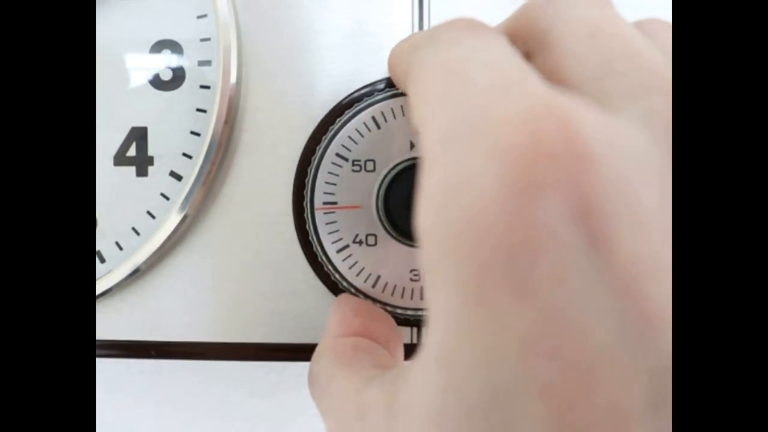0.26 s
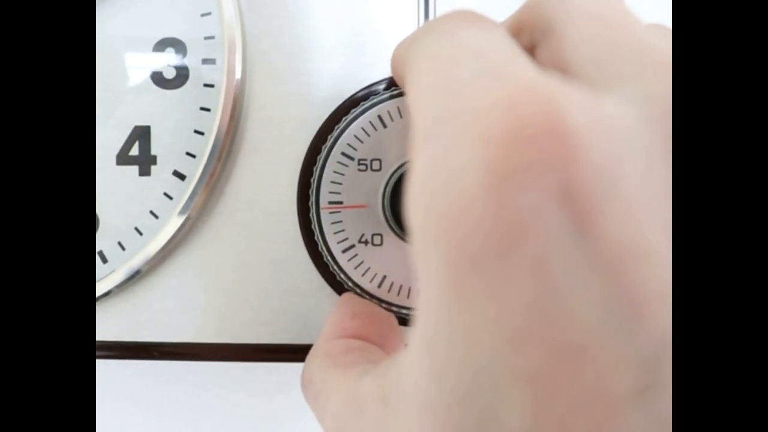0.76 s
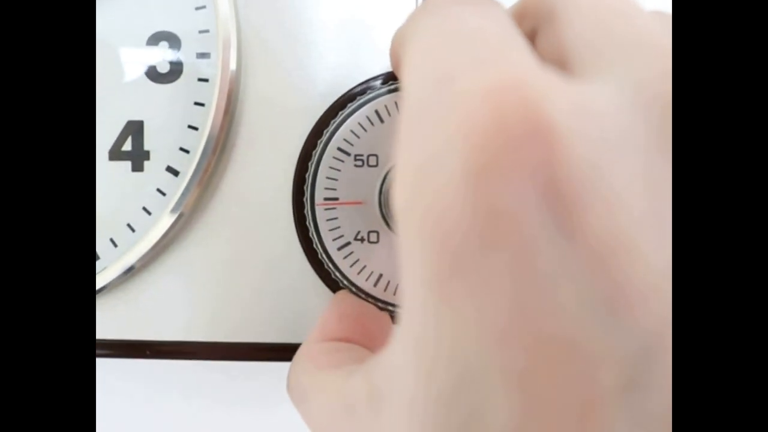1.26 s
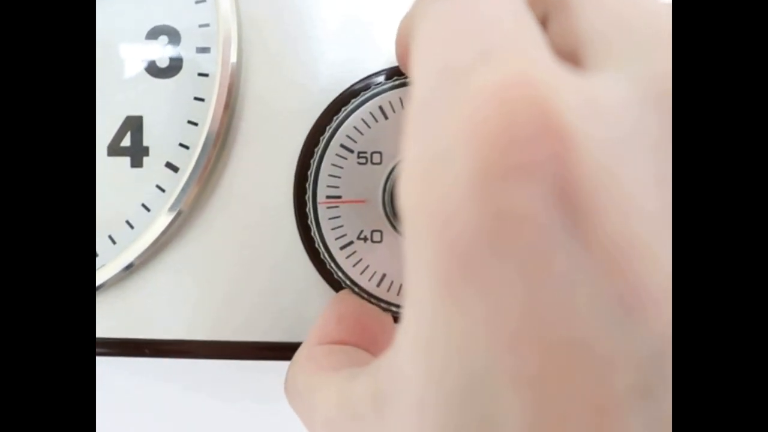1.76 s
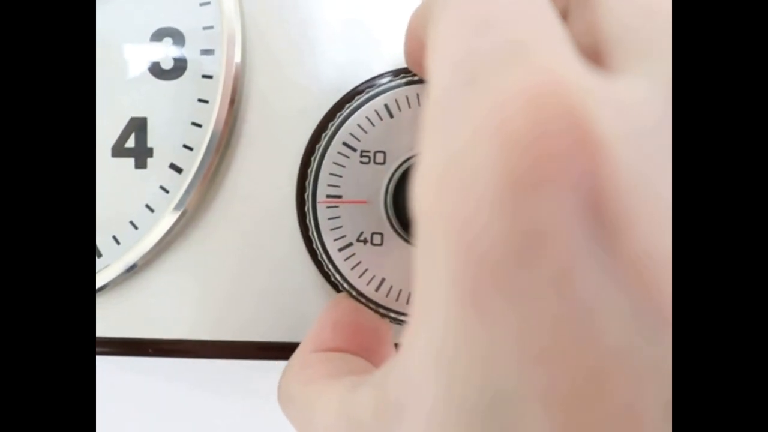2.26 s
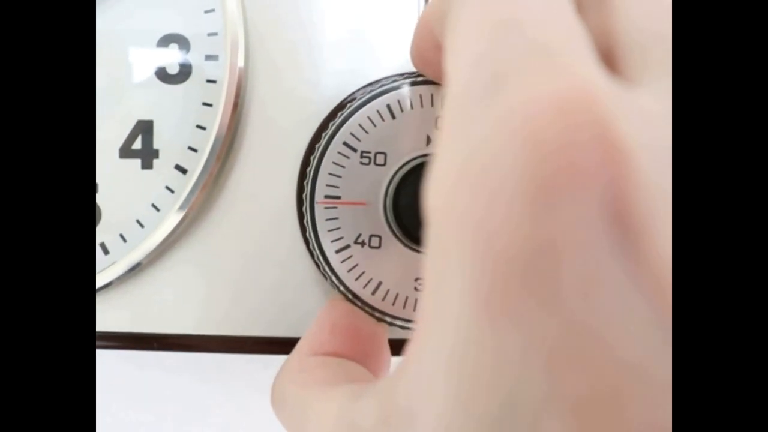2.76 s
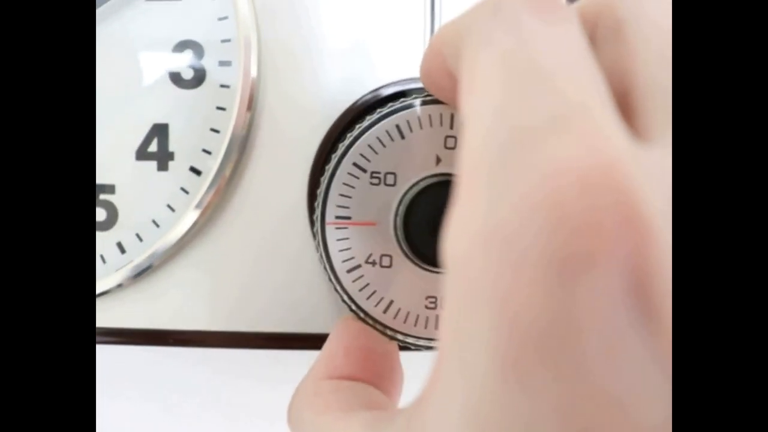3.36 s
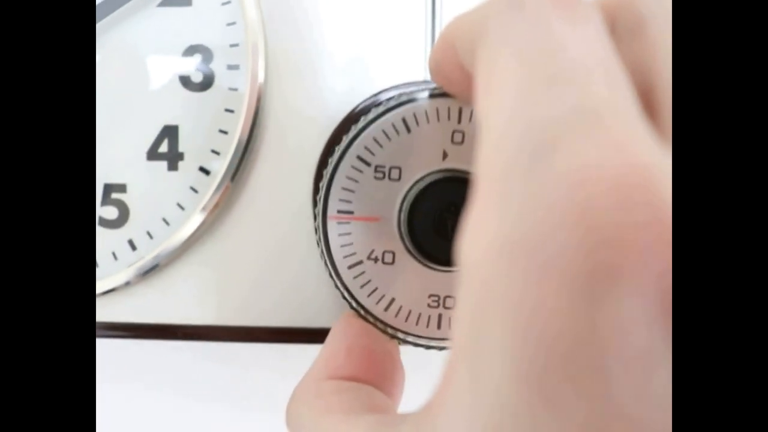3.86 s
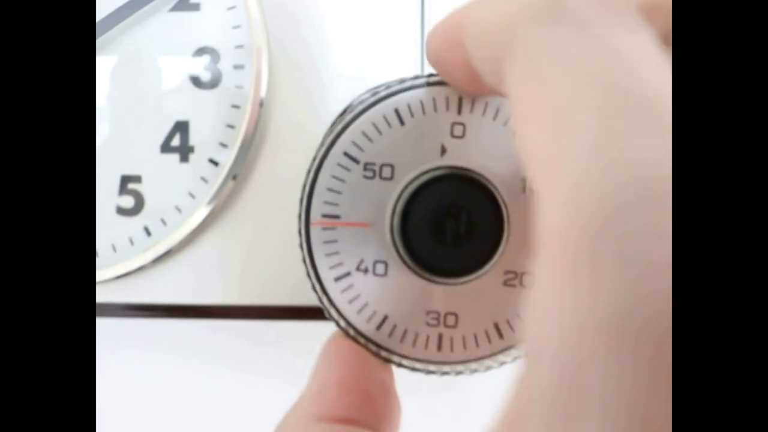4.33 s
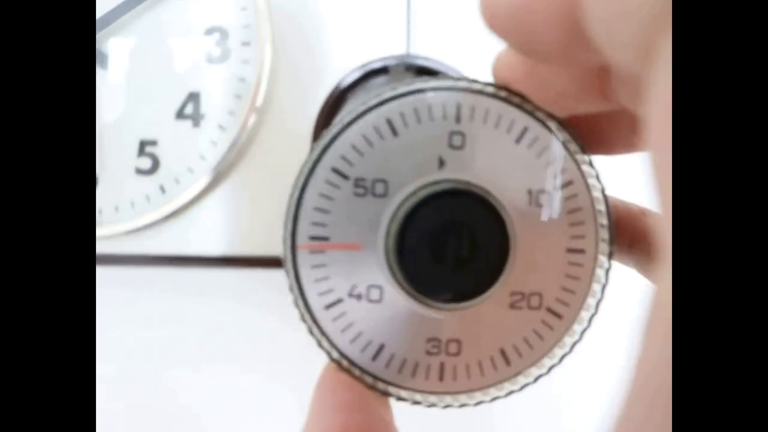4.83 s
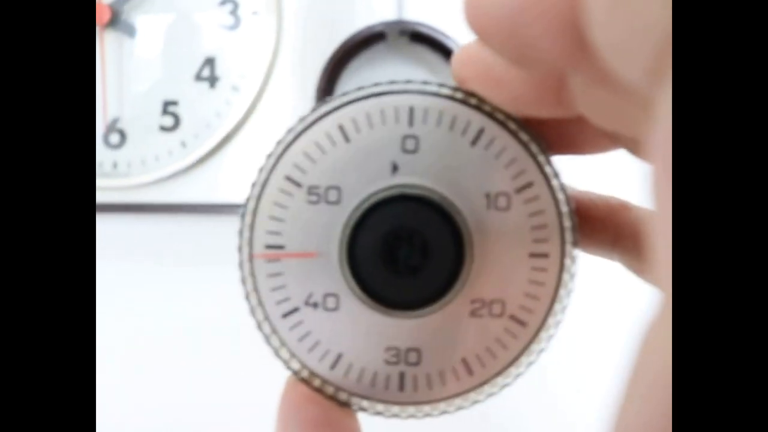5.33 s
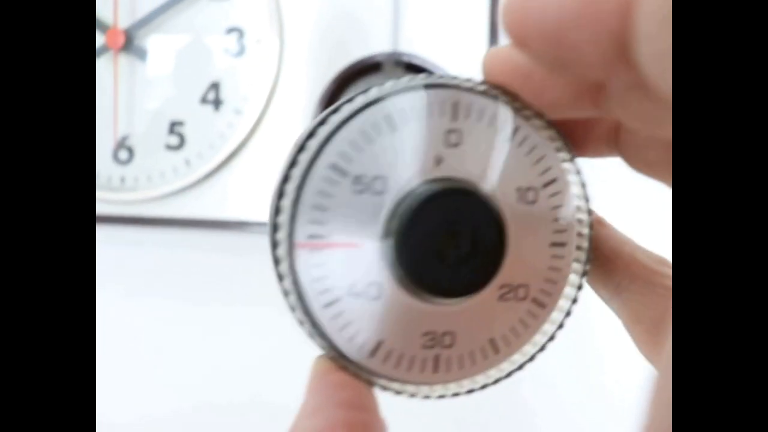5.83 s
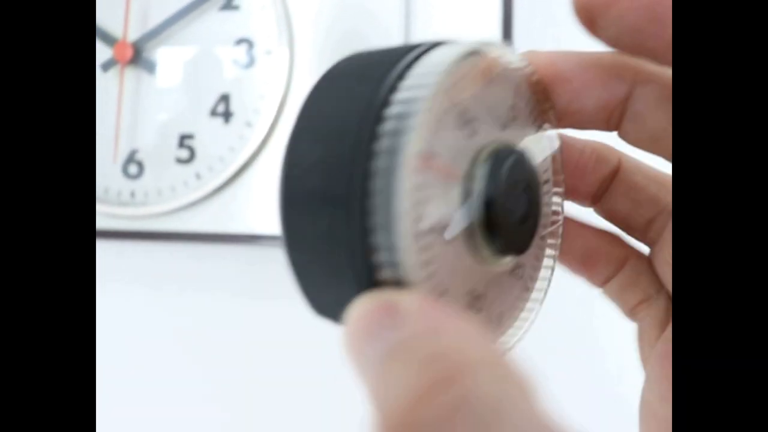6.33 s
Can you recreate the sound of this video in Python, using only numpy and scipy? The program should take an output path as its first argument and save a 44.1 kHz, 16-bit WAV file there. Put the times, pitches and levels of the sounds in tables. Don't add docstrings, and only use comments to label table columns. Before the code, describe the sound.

Close, crisp mechanical ticking, about four beats a second, with finger scuffs, hollow plastic knocks, a sharp pull-off clack and faint metallic pings in a quiet kitchen.

```python
import sys
import numpy as np
from scipy import signal
from scipy.fft import rfft, irfft, next_fast_len
from scipy.io import wavfile
from scipy.ndimage import uniform_filter1d, map_coordinates

SR = 44100
rng = np.random.default_rng(int(sys.argv[2]) if len(sys.argv) > 2 else 0)


def attenuation_scalar(level_db):
    decades = np.asarray(level_db, float) / 20
    return 10 ** decades


def transcribe(u):
    v = np.clip(np.atleast_2d(u).T, -1, 1)
    q = np.round(v * 32767).astype(np.int16)
    wavfile.write(sys.argv[1], SR, q)


N = 290619
LIFT_S = 3.0

# (pitch [Hz], level [dB], t60 [s])
SEATED = [(2900, -18, .008), (3420, -10, .009), (3980, -1, .011), (4770, 0, .01), (5280, 0, .009),
          (6100, -3, .008), (6750, -12, .007), (8400, -15, .007)]
LIFTED = [(2940, -12, .009), (3300, -8, .01), (4040, -1, .011), (4320, -1, .012), (4820, -4, .009),
          (5400, -3, .009), (5930, -4, .009), (6700, -8, .009)]
# (pitch [Hz], level [dB], t60 [s])
BELL = [(2212, 0, .075), (2246, -5, .06)]
# (pitch [Hz], level [dB], t60 [s])
SHELL = [(850, -8, 0.26), (1054, -3.5, 0.018), (1228, 16, 0.0064), (1494, -0.5, 0.03), (1910, 9.5, 0.0041)]


def evened(x):
    return x / np.sqrt(np.mean(x ** 2) + 1e-20)


def peaked(x):
    return x / (abs(x).max() + 1e-12)


def read(points, hz):
    f, value = np.transpose(points)
    return np.interp(np.log(hz + 1), np.log(f + 1), value)


def add(mix, s, sound):
    part = mix[round(s * SR):][:len(sound)]
    part += sound[:len(part)]


def ring(modes, spread_db, luck, scale=1, size=6000):
    t = np.arange(size) / SR
    total = 0
    for k, (hz, db, t60) in enumerate(modes):
        pitch = hz * scale * (1 + 0.015 * luck[2 * k + 1])
        total = total + attenuation_scalar(db + spread_db * luck[2 * k] - 60 * t / t60) * np.sin(2 * np.pi * pitch * t)
    return total


def resonate(x, hz, width):
    r = np.exp(-np.pi * width / SR)
    return (1 - r) * signal.lfilter([1, 0, -r], [1, -2 * r * np.cos(2 * np.pi * hz / SR), r * r], x)


def air():
    # (frequency [Hz], level per Hz [dB])
    room = [(20, -40), (45, 5), (62, -13), (85, -9), (120, -2.5), (400, -3), (700, -9.5), (1100, -7),
            (2200, -13), (4100, -11), (7000, -18), (12900, -23), (16000, -30)]
    # (frequency [Hz], correlation [0-1])
    likeness = [(40, 0.6), (300, 0.39), (1500, 0.02), (6000, 0.022), (14000, 0.067)]
    frames, hz = N // 256 + 5, np.fft.rfftfreq(1024, 1 / SR)
    a, b, c, d, patches = rng.standard_normal((frames, 513, 5)).T
    patches = evened(uniform_filter1d(uniform_filter1d(patches, 12, 0), 14, 1))
    same = np.clip(read(likeness, hz), -1, 1)[:, None]
    left = a + 1j * b
    right = same * left + np.sqrt(1 - same ** 2) * (c + 1j * d)
    z = np.array([left, right]) * attenuation_scalar(read(room, hz)[:, None] + 1.3 * patches)
    return attenuation_scalar(-54) * evened(signal.istft(z, nperseg=1024, noverlap=768)[1][:, :N])


def rumble():
    # (time [s], level [dB])
    shake = [(0, -68), (.45, -68), (.7, -61.5), (1.6, -64.5), (2.3, -60), (2.55, -72), (5, -88), (5.5, -59),
             (5.9, -84), (6.59, -60)]
    band = signal.butter(2, (80, 190), "band", fs=SR, output="sos")
    low = signal.sosfilt(band, rng.standard_normal(N))
    return attenuation_scalar(np.interp(np.arange(N) / SR, *np.transpose(shake))) * evened(low)


def friction():
    # (time [s], gear train drag [dB], finger rub [dB])
    steady = [(0, -57.5, -64), (.4, -114, -54.5), (1.1, -54.5, -50), (1.5, -100, -77), (2.9, -88, -59),
              (3.3, -55, -55), (4., -114, -80), (6.59, -66, -119)]
    # (time [s], length [s], wheel level [dB], skin level [dB])
    scrapes = [(0.414, 0.05, -58, -78), (1.269, 0.093, -61, -47.5), (2.116, 0.31, -53.5, -49.5),
               (2.946, 0.17, -55.5, -51.5), (3.53, 0.053, -66, -46.5), (4.258, 0.15, -55, -46.5),
               (4.755, 0.24, -50, -69), (5.03, 0.077, -55.5, -61), (5.212, 0.28, -54, -53.5),
               (5.496, 0.13, -57.5, -54), (5.8, 0.17, -71, -54), (6.09, 0.076, -51, -50.5),
               (6.22, 0.087, -71, -70), (0.1, 0.34, -62, -68)]
    # (pitch [Hz], width [Hz], level [dB])
    skin_modes = [(162, 176, -0.5), (392, 175, 4.5), (573, 76, 8.5), (707, 35, 13.5), (962, 86, 10),
                  (1555, 420, -3)]
    rim_s = 3.8
    t, (s, drag_db, rub_db) = np.arange(N) / SR, np.transpose(steady)
    drag, rub = attenuation_scalar(np.interp(t, s, drag_db)), attenuation_scalar(np.interp(t, s, rub_db))
    for start, length, wheel_db, skin_db in scrapes:
        size = round(length * SR)
        stroke = signal.windows.tukey(size, .5) * np.linspace(1.3, .5, size)
        add(drag, start, attenuation_scalar(wheel_db) * stroke)
        add(rub, start, attenuation_scalar(skin_db) * stroke)
    grains = rng.standard_normal((2, N)) * attenuation_scalar(1.4 * np.minimum(rng.exponential(1, (2, N)), 5))
    clump_db = np.array([[2], [6]])
    clumps = attenuation_scalar(clump_db * evened(uniform_filter1d(rng.standard_normal((2, N)), 300)))
    wheel, skin = grains * clumps
    seated, lifted = (evened(sum(attenuation_scalar(0.17 * db) * resonate(wheel, hz, 690) for hz, db, _ in modes))
                      for modes in (SEATED, LIFTED + BELL))
    case = evened(sum(attenuation_scalar(db) * resonate(resonate(skin, hz, 2 * w), hz, w) for hz, w, db in skin_modes))
    shell = evened(sum(attenuation_scalar(db) * resonate(resonate(skin, hz, 790), hz, 400) for hz, db, _ in SHELL))
    return drag * np.where(t < LIFT_S, seated, lifted) + rub * np.where(t < rim_s, case, shell)


def beats():
    # (drop [s], drop [dB], bell re drop [dB], unlock lead [ms], unlock [dB])
    ticks = [(0.1659, -16.5, -27, 51, -33.5), (0.6817, -21, -22, 48, -37), (1.1977, -20, -23, 46.2, -31),
             (1.7166, -23, -23, 55, -35), (2.2305, -20.5, -40, 52, -33), (2.747, -20, -22, 52, -36),
             (3.2629, -20, -20.5, 46.7, -34), (3.7803, -23.5, -15, 50, -39),
             (4.2968, -22, -11, 52.4, -31.5), (4.811, -18, -28, 46.9, -29.5),
             (5.3283, -18.5, -13, 50.5, -31), (5.8452, -20, -16, 46, -31), (6.363, -19.5, -18, 46.6, -27.5)]
    # (drop [s], drop [dB], slide lead [ms], slide [dB], unlock [dB])
    tocks = [(0.445, -22, 14.2, -33.5, -54), (0.961, -22, 19, -22.5, -39), (1.4813, -27, 18, -42, -53),
             (1.9986, -30.5, 18, -34, -67), (2.5132, -26, 30, -38.5, -45), (3.029, -31, 18.4, -32, -49),
             (3.5455, -30, 17, -36.5, -44), (4.0633, -28, 15, -39, -42.5), (4.579, -24.5, 15, -34.5, -37.5),
             (5.0928, -23.5, 19.5, -34, -35), (5.6078, -26.5, 14, -30, -37.5),
             (6.1263, -27.5, 12, -31, -38)]
    tooth_hz = [4200, 5000, 4800, 5000, 4260, 4240, 5000, 5470, 4600, 4120, 4160, 4250, 4200]
    # (bell re peak [dB], treble re peak [dB], shell re peak [dB], contact [ms])
    tick_unlock = [(-9.5, -23.5, -8, 15.7), (-9.5, -12.5, -4, 4.8)]
    tick_drop = [(0, -13.5, -16, 4.25), (2, -8, -11.5, 5.8)]
    tick_bounce = [(12, -11, -12.5, 1.5), (12, -37, -8, 14.8)]
    tock_unlock = [(-22, -37, -23, 6.3), (-7, -32, -6, 5.2)]
    tock_slide = [(-21, -46, -8, 5.3), (-11, -31, -4.5, 13)]
    tock_drop = [(-27, -9.5, -14, 0.68), (-13, -6, -9.5, 8.2)]
    tock_bounce = [(-6, -5, -41, 4), (-71, -11.5, -21, 2.2)]
    # (after the drop, negative before it [ms], seated re drop
    # [dB], lifted re drop [dB])
    tick_after = [(-11, -26, -19.5), (23.5, -53, -15), (58.5, -29, -23)]
    # (time [s], peak [dB], bell re
    # peak [dB], shell re peak [dB], contact [ms])
    snaps = [(0.3102, -44, -4, -13, 3.8), (0.547, -43, -6, -2, 1.3), (0.976, -30, -30, -11, 6.5),
             (1.0078, -16.5, -41, 0, 6.8), (1.261, -40.5, -21, 7, 14), (1.5187, -41.5, -25, 1, 5.2),
             (2.08, -41.5, -4, -11, 2.7), (2.2057, -18.5, -40, 1.5, 6.7), (2.265, -33, -9, -8, 5),
             (2.8905, -40.5, -8, 20, 1.8), (2.9311, -20, -1, 8, 6.7), (4.066, -44.5, 12, 10, 6.5),
             (4.4844, -54, 5, 2, 6.6), (4.7875, -25.5, -35, -8, 12), (5.259, -46, 4, 1, 6.3),
             (6.2188, -49, -25, 4.5, 5.2), (6.2644, -49, 4, 9, 15), (6.5814, -39.5, -9, -8, 4.4)]
    # (time [s], peak [dB], centre [Hz], treble re peak [dB], shell re peak [dB])
    rattles = [(.257, -41.5, 3300, -20, 1), (.392, -46, 4200, -20, -15), (.6755, -42.5, 3000, -20, 10),
               (.918, -53, 3000, -20, 17), (.93, -63, 3000, -20, 0), (1.233, -46, 4400, -20, -15),
               (1.27, -42.5, 3300, -15, 3), (1.3045, -44, 3120, -20, 4), (1.34, -48.5, 3200, -20, 7.5),
               (1.385, -44, 4000, -23, -15), (1.455, -38, 4600, -24, -22), (2.199, -26, 4200, -21, 3),
               (2.216, -20.5, 3900, -20, -6), (2.942, -21.5, 3200, -21, -11), (4.33, -40, 3400, -20, -8),
               (4.365, -36.5, 3400, -20, -8), (4.80, -29, 5200, -11, -4), (4.829, -39, 5000, -13, -4),
               (4.878, -40, 4800, -12, -4), (5.267, -43, 6000, 10.5, 7), (5.298, -54, 3200, -20, 1),
               (5.316, -47, 3300, -15, 2), (5.346, -30, 3600, -12, -7), (5.387, -43, 3800, -13, -4),
               (5.398, -43, 3600, -13, 0), (6.256, -52, 3180, -20, 8), (6.277, -53, 3200, -15, 1),
               (6.308, -40, 2900, -28, -6)]
    works_hz = 4500
    rows = [(s, db, bell_db, -12.5, shell_db, ms, works_hz) for s, db, bell_db, shell_db, ms in snaps]
    for (s, db, bell_db, lead, unlock_db), hz in zip(ticks, tooth_hz):
        up = int(s > LIFT_S)
        unlock_bell = tick_unlock[up][0] + .8 * (bell_db + 17)
        rows.append((s - lead / 1000, unlock_db, unlock_bell, *tick_unlock[up][1:], works_hz))
        rows.append((s, db, bell_db + tick_drop[up][0], *tick_drop[up][1:], hz))
        for ms, *by in tick_after:
            bounce_bell = bell_db + tick_bounce[up][0]
            rows.append((s + ms / 1000, db + by[up], bounce_bell, *tick_bounce[up][1:], works_hz))
    for s, db, lead, slide_db, unlock_db in tocks:
        up = int(s > LIFT_S)
        bounce_db = db + (-13.5, -5.5)[up]
        rows += [(s - .062, unlock_db, *tock_unlock[up], works_hz),
                 (s - .0465, unlock_db - 0.5, *tock_unlock[up], works_hz),
                 (s - lead / 1000, slide_db, *tock_slide[up], works_hz),
                 (s, db, *tock_drop[up], works_hz),
                 (s + .0185, bounce_db, *tock_bounce[up], works_hz)]
    return rows + [(s, db, -27, treble_db, shell_db, 4.9, hz) for s, db, hz, treble_db, shell_db in rattles]


def clicks():
    lead_s = .012
    out, t, rows = np.zeros(N), np.arange(3000) / SR, beats()
    luck = rng.standard_normal((len(rows), 6040))
    treble = signal.butter(2, [6800, 15000], "band", fs=SR, output="sos")
    thin = signal.butter(3, 720, "high", fs=SR, output="sos")
    middle = signal.butter(2, [2700, 7300], "band", fs=SR, output="sos")
    for (s, db, bell_db, treble_db, shell_db, ms, hz), z in zip(rows, luck):
        u = np.maximum(1000 * (t - lead_s) / max(ms, .5), 0)
        soft = np.clip((-26.5 - db) / 11, 0, 1)
        contact = (1 - np.exp(-(u / (0.0022 + 0.54 * soft)) ** 2)) * np.exp(-u ** 3) * z[40:3040]
        grain = attenuation_scalar(6.4 * np.minimum(evened(uniform_filter1d(z[3040:], 50)), 1.8))
        swell = np.exp(-abs(t - lead_s) / np.where(t < lead_s, .004, .012))
        slither = swell * grain * z[3039:39:-1] * signal.windows.tukey(len(t), .1)
        chatter = contact + attenuation_scalar(-21 + 11 * soft) * np.where(t < lead_s, .4, 1) * slither
        strike = (1 - soft) * attenuation_scalar(10) * (np.arange(len(t)) == round(lead_s * SR) + 8)
        modes = [(f, d - 13 * np.log2(f / hz) ** 2, .85 * t60)
                 for f, d, t60 in (SEATED if s < LIFT_S else LIFTED)]
        works = signal.fftconvolve(chatter + strike, ring(modes, 2.5, z, size=1200))
        snap = np.pad(chatter + attenuation_scalar(-16.5) * strike, (0, len(works) - len(chatter)))
        direct = peaked(signal.sosfilt(middle, snap))
        body = peaked(signal.sosfilt(middle, peaked(works) + attenuation_scalar(-12.5) * direct))
        pinged = snap + attenuation_scalar(6) * resonate(snap, 8330, 910)
        top = peaked(signal.sosfilt(treble, signal.sosfilt(treble, pinged)))
        slow = contact + attenuation_scalar(5.5) * np.where(t < lead_s, soft, 1) * slither
        bell = peaked(signal.fftconvolve(slow, ring(BELL, 0, 0 * z, size=3600)))
        shell = signal.fftconvolve(slow, ring(SHELL, 2.5, z[20:], size=3600))
        shell = peaked(signal.sosfilt(thin, shell))
        start = s - lead_s - .0002
        add(out, start, attenuation_scalar(db + 0.59) * (body + attenuation_scalar(treble_db) * top))
        add(out, start, attenuation_scalar(db) * (attenuation_scalar(bell_db - 2.5) * bell + attenuation_scalar(shell_db - 1.35) * shell))
    return out


def blows():
    # (time [s], peak [dB], case pitch [Hz], shell re peak [dB])
    slips = [(0.121, -41, 1030, 7), (0.2, -39, 730, -4), (0.366, -40.5, 650, -16), (0.507, -29.5, 614, -37),
             (0.529, -34.5, 733, -13), (0.566, -34, 736, 4.5), (0.601, -29, 733, -28),
             (0.656, -36, 700, -9), (0.693, -29.5, 610, -20), (0.722, -37, 730, -4),
             (0.797, -27.5, 624, -31), (0.916, -32.5, 650, -11), (0.943, -24.5, 715, -9.5),
             (0.981, -23.5, 767, -10), (1.259, -51, 980, -12)]
    # (time [s], peak [dB], case pitch [Hz], panel re peak [dB])
    rocks = [(1.03, -37, 900, -18), (1.062, -27, 567, -9), (1.126, -44, 694, 1), (1.381, -28.5, 551, -6),
             (1.52, -23, 592, -12), (1.652, -26, 570, -15.5), (1.797, -20, 570, -14),
             (1.821, -32, 613, -10.5), (1.944, -33, 556, -16), (2.069, -20, 582, -9.5),
             (2.159, -50, 610, -6), (2.2, -22, 607, -6), (2.215, -19, 676, -9.5), (2.233, -25, 977, -12),
             (2.313, -59, 664, 10)]
    # (time [s], peak [dB], case pitch [Hz], shell re peak [dB])
    pulls = [(2.634, -43.5, 765, 1.5), (2.867, -41.5, 610, -3), (2.893, -21.5, 755, -5),
             (2.904, -22, 583, -13), (2.9347, -13.5, 769, 1), (3.338, -42.5, 756, 2.5),
             (3.439, -43, 766, -15), (3.657, -38, 587, 7.5), (4.787, -43.5, 475, -13),
             (5.262, -45, 624, -3), (5.3, -45, 640, -2), (6.216, -50, 713, -8), (6.256, -49, 1090, -5),
             (6.268, -43.5, 690, -12)]
    # (time [s], peak [dB], case pitch [Hz], shell re peak [dB], scrape [ms])
    raps = [
        (.517, -28, 710, -15, 4.2),
        (.548, -30, 710, -2, 6.8),
        (.608, -32, 554, -20, 8),
        (.875, -50, 635, -18, 10),
        (1.01, -20, 1010, 1, 4.7),
        (2.9317, -15, 1140, -9.5, 7.3),
    ]
    rows = [(s, db, hz, -80 - db, shell_db, 25.4, 0.6, 0.37) for s, db, hz, shell_db in slips]
    rows += [(s, db, hz, panel_db, -24, 21, 0.69, 4.5) for s, db, hz, panel_db in rocks]
    rows += [(s, db, hz, -54 - db, shell_db, 7.2 - 0.63 * db, 0.81, 0.2) for s, db, hz, shell_db in pulls]
    return rows + [(s, db, hz, -14.5, shell_db, ms, 0.2, 0.23) for s, db, hz, shell_db, ms in raps]


def knocks():
    # (multiple of its pitch [ratio], level [dB], t60 [s])
    case_modes = [(1.01, 10, 0.04), (1.24, -8.5, 0.071), (0.773, -4, 0.069), (1.6, -17.5, 0.26)]
    # (pitch [Hz], level [dB], t60 [s])
    panel_modes = [(184.7, 0.5, 0.082), (374, 3.5, 0.029)]
    seat_s = 0.002906
    out, t, rows = np.zeros(N), np.arange(2500) / SR, blows()
    luck = rng.standard_normal((len(rows), 2540))
    for (s, db, hz, panel_db, shell_db, ms, damp, seat), z in zip(rows, luck):
        touch = np.exp(-((t - .001) / 0.00025) ** 2)
        seating = seat * np.exp(-((t - .001 - seat_s) / 0.00031) ** 2)
        scrape = np.exp(-(1000 * t / max(ms, 1)) ** 2) * z[40:]
        push = peaked(np.gradient(touch + seating)) + attenuation_scalar(-3.0) * scrape
        gripped = [(f, d, damp * t60) for f, d, t60 in case_modes]
        parts = (ring(gripped, 3, z, hz), ring(panel_modes, 2.5, z[8:]), ring(SHELL[1:], 2.5, z[16:]))
        case, panel, shell = (peaked(signal.fftconvolve(push, p)) for p in parts)
        case = signal.sosfilt(signal.butter(2, 0.44 * hz, "high", fs=SR, output="sos"), case)
        add(out, s - .0015, attenuation_scalar(db + 0.3) * (case + attenuation_scalar(panel_db) * panel + attenuation_scalar(shell_db) * shell))
    return out


def drone():
    # (time [s], pitch [Hz], level [dB])
    spells = [
        [(2.3, 144, -72), (2.428, 125, -64), (2.8, 125, -67)],
        [(3.9, 120, -67.5), (4.818, 122, -62.5), (5.0, 92.7, -90)],
        [(6.0, 97.7, -79), (6.386, 102.6, -61), (6.59, 108, -69)],
    ]
    out = np.zeros(N)
    for rows in spells:
        s, hz, db = np.transpose(rows)
        t = np.arange(s[0], s[-1], 1 / SR)
        tone = np.sqrt(2) * np.sin(2 * np.pi * np.cumsum(np.interp(t, s, hz)) / SR)
        add(out, s[0], attenuation_scalar(np.interp(t, s, db)) * tone * signal.windows.tukey(len(t), .2))
    return out


def sings():
    # (time [s], pitch [Hz], level [dB], t60 [s])
    partials = [(5.1, 1515, -49, .12), (5.284, 2222, -43, .1), (5.333, 2222, -37, .18),
                (5.36, 4290, -48, .2), (5.62, 1515, -50, .12), (6.128, 1515, -48, .14),
                (6.132, 3155, -48, .15), (6.256, 3155, -55, .08), (6.318, 3155, -47, .14),
                (6.37, 4200, -46, .2)]
    out, t = np.zeros(N), np.arange(6000) / SR
    for s, hz, db, t60 in partials:
        add(out, s, np.minimum(t / 0.0036, 1) * ring([(hz, db, t60)], 0, (0, 0)))
    return out


def ports(x):
    # (frequency [Hz], left minus right [dB])
    balance = [(100, 2.5), (700, 0.5), (1400, -0.5), (2200, -6.5), (4200, 0), (9000, 2.5), (14000, 1.5)]
    # (time [s], left port lag [microseconds], left minus right [dB])
    place = [(0, 24, -3), (3.2, 24, -2), (4.2, 32, -2.4), (5.0, 33.5, 0), (6.0, 30.5, -3), (6.59, 19, -3)]
    t, size = np.arange(N) / SR, next_fast_len(N)
    half = attenuation_scalar(.5 * read(balance, np.fft.rfftfreq(size, 1 / SR)))
    left, right = irfft(rfft(x, size) * np.array([half, 1 / half]), size)[:, :N]
    s, lag, pan_db = np.transpose(place)
    late = (t - np.interp(t, s, lag) / 10 ** 6) * SR
    side = attenuation_scalar(.5 * np.interp(t, s, pan_db))
    return np.array([side * map_coordinates(left, [late], order=5), right / side])


def kitchen(x):
    # (frequency [Hz], t60 [s])
    decay = [(150, 0.43), (700, 0.3), (2500, 0.42), (6000, 0.23), (14000, 0.32)]
    taps = np.zeros((2, SR // 2))
    at = np.arange(260, SR // 2 - 20, 20) + rng.integers(0, 20, (2, (SR // 2 - 261) // 20))
    np.put_along_axis(taps, at, rng.choice([-1., 1.], at.shape), 1)
    hz, t, z = signal.stft(taps, SR, nperseg=256)
    fade = attenuation_scalar(-60 * t / np.maximum(read(decay, hz), .03)[:, None])
    tail = signal.istft(z * fade, SR, nperseg=256)[1]
    return signal.fftconvolve(x, tail / np.linalg.norm(tail[0]), axes=1)[:, :N]


def scene():
    no_bass = signal.butter(4, 135, "high", fs=SR, output="sos")
    hits = signal.sosfilt(no_bass, clicks() + knocks())
    timer = hits + friction() + sings()
    return attenuation_scalar(-9.0) * kitchen(timer[None]) + air() + drone() + rumble() + ports(timer)


def band_limit(x):
    return signal.sosfilt(signal.butter(12, 16480, fs=SR, output="sos"), x)


def record(dry):
    edge = signal.firwin(511, 16200, window=("kaiser", 8), fs=SR)
    thin = signal.sosfilt(signal.butter(4, 37, "high", fs=SR, output="sos"), dry)
    return band_limit(signal.oaconvolve(thin, edge[None], "same"))


dry = scene()
out = record(dry)
transcribe(out)
```